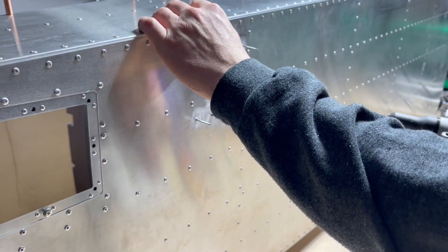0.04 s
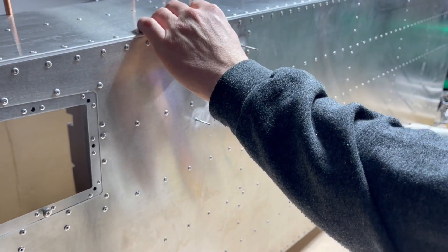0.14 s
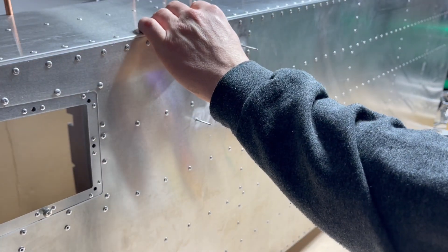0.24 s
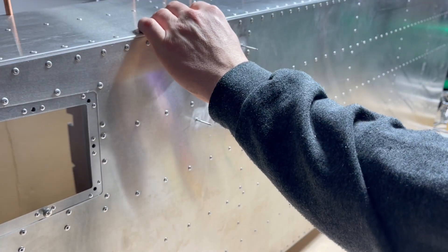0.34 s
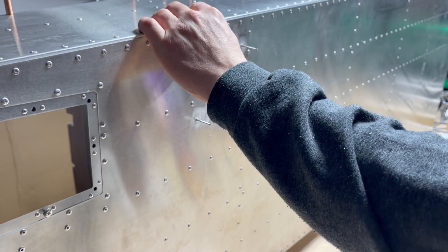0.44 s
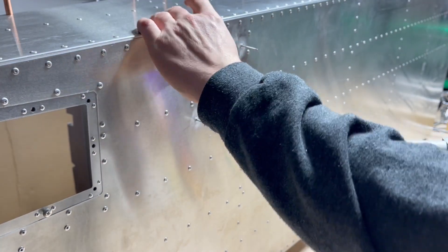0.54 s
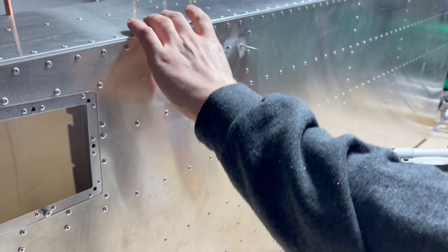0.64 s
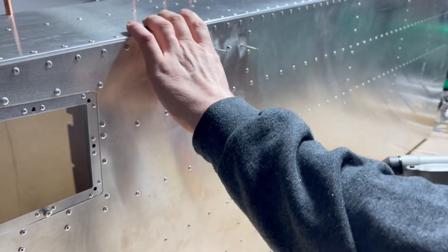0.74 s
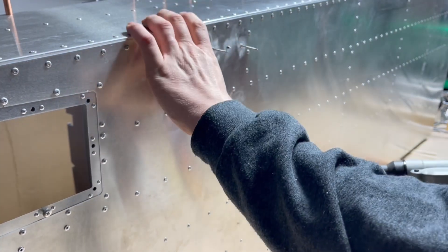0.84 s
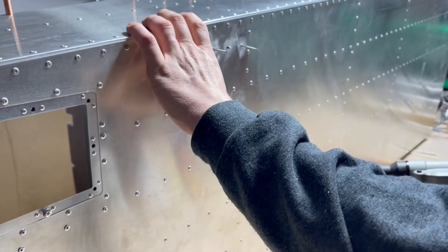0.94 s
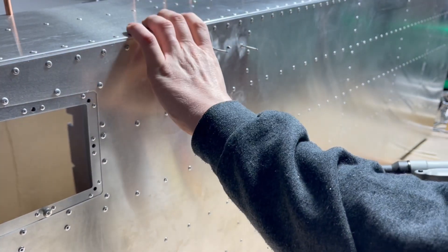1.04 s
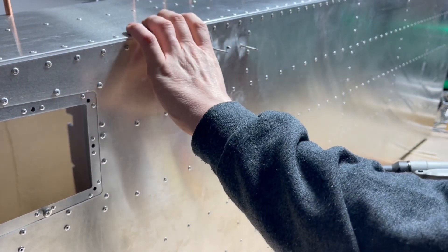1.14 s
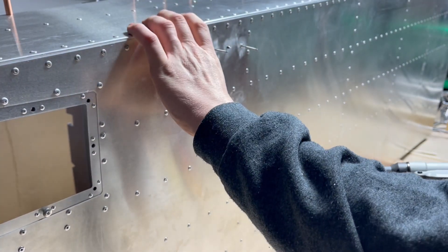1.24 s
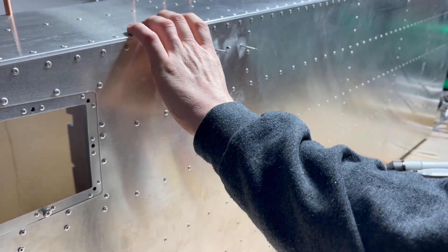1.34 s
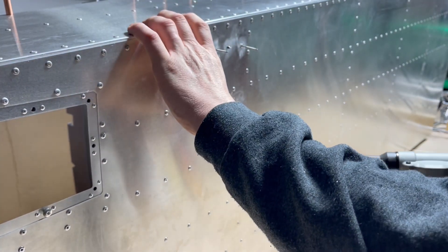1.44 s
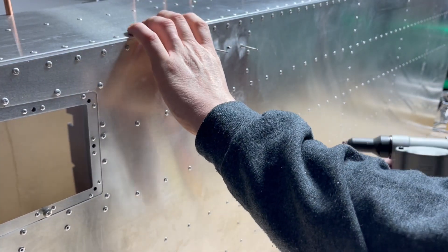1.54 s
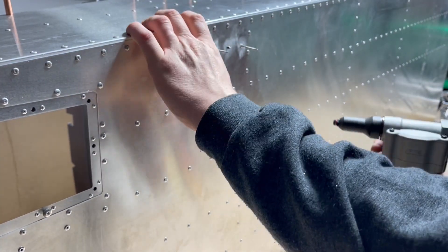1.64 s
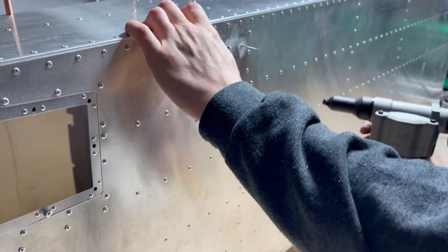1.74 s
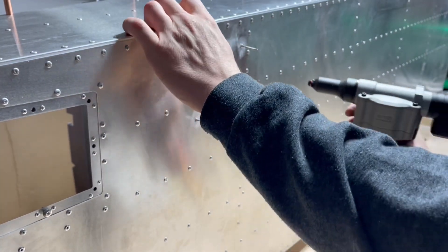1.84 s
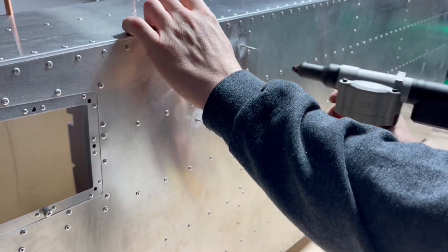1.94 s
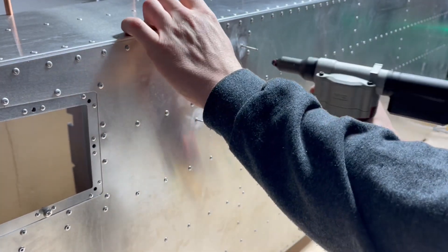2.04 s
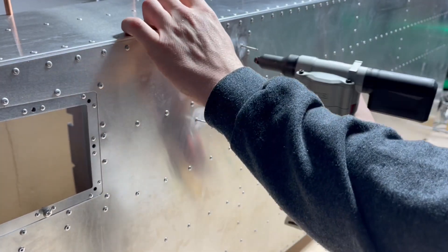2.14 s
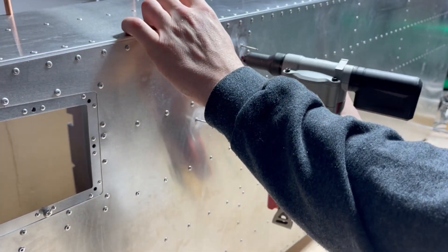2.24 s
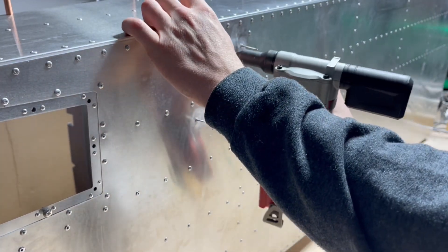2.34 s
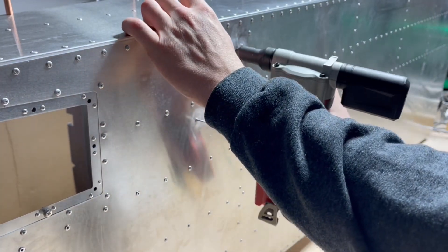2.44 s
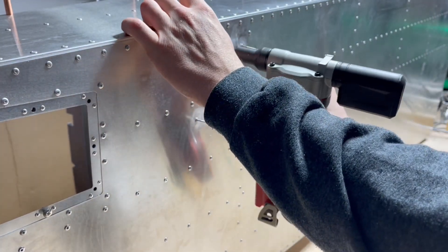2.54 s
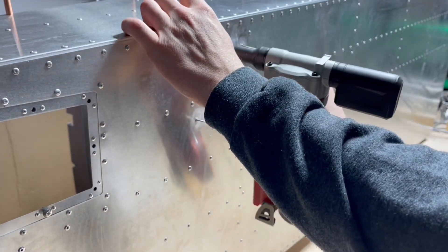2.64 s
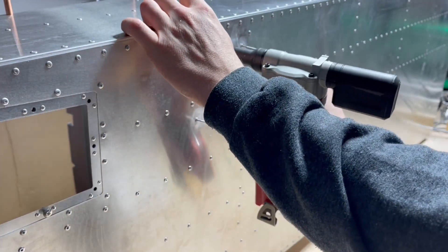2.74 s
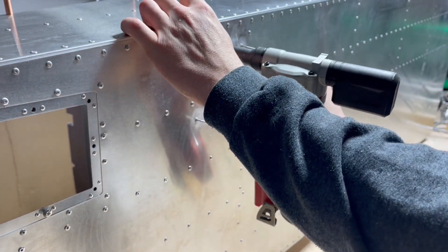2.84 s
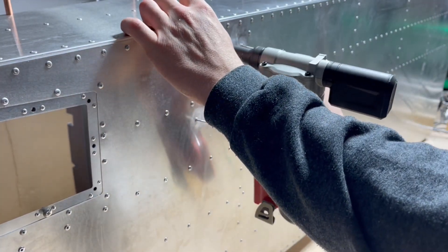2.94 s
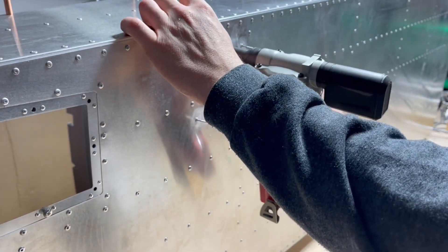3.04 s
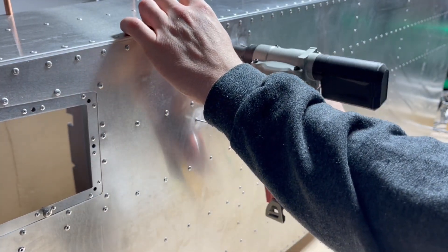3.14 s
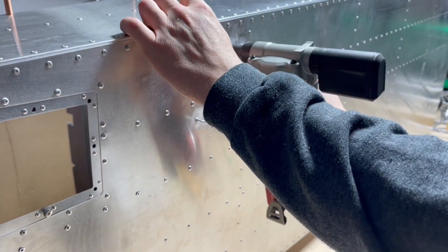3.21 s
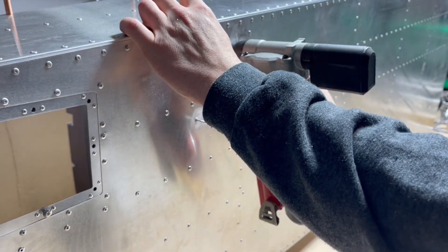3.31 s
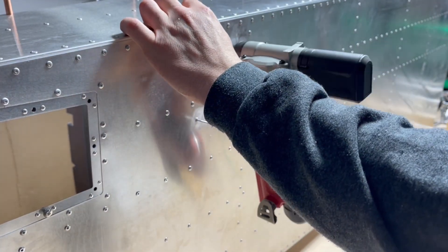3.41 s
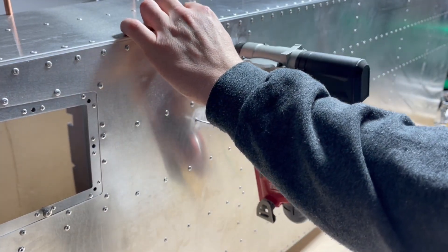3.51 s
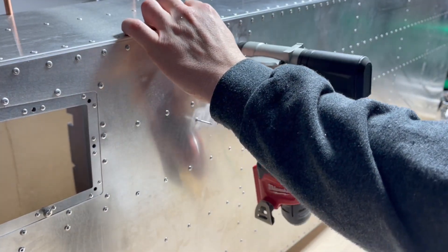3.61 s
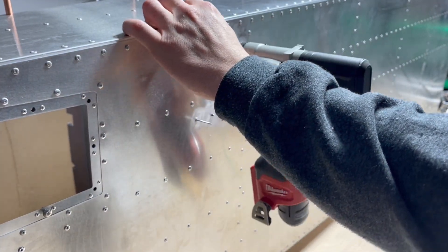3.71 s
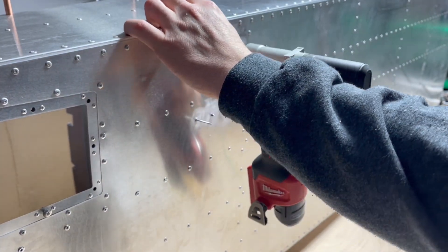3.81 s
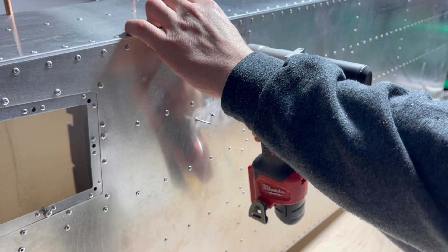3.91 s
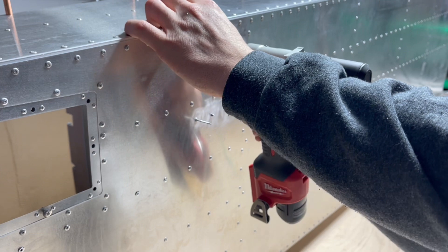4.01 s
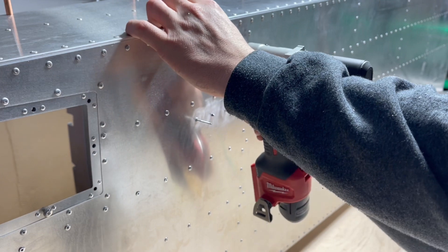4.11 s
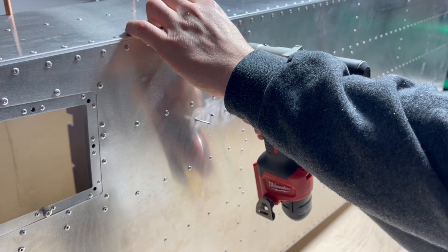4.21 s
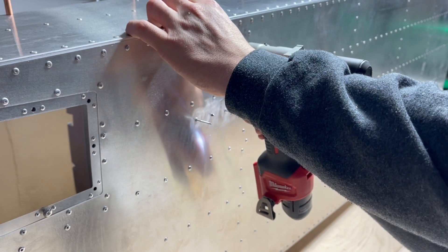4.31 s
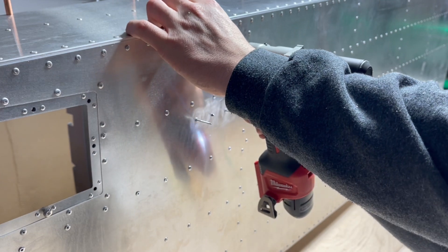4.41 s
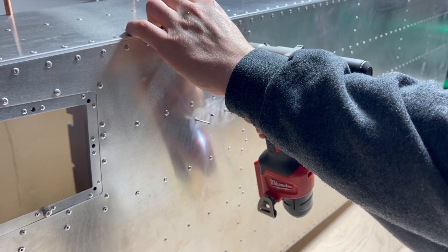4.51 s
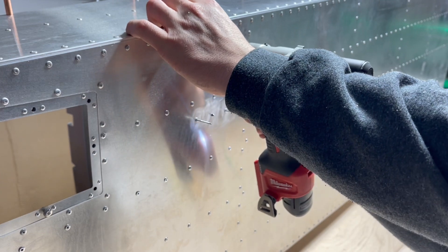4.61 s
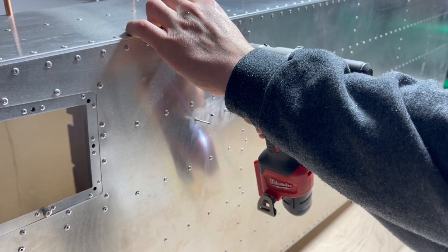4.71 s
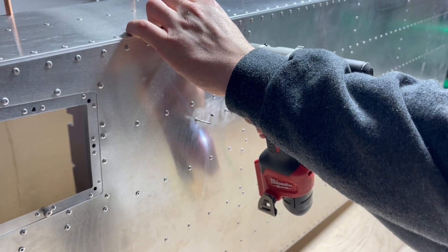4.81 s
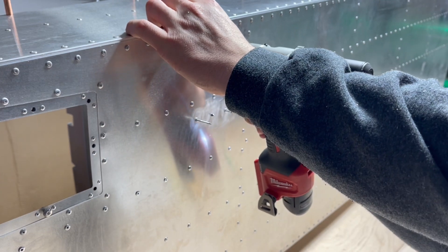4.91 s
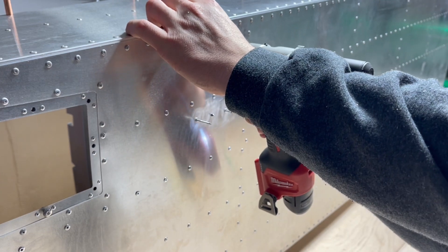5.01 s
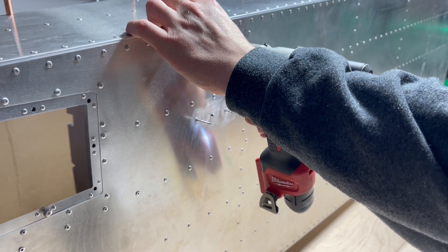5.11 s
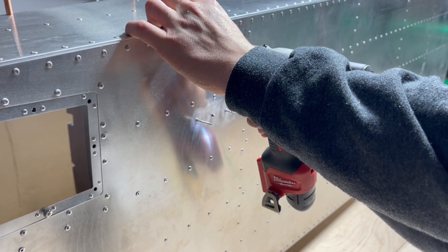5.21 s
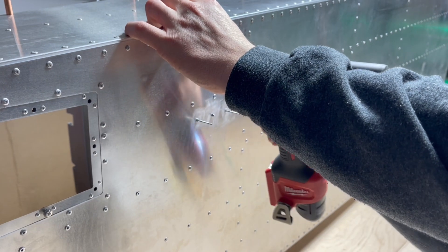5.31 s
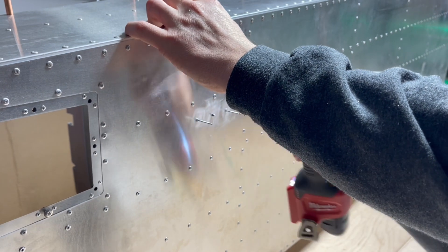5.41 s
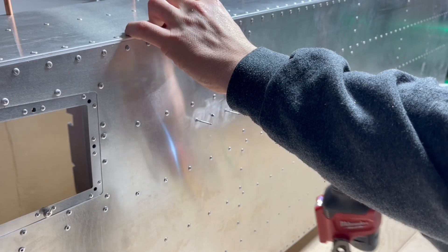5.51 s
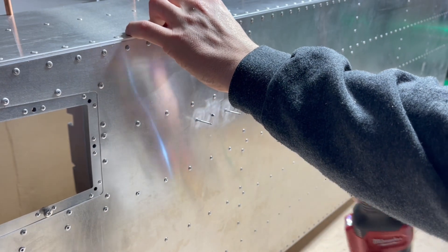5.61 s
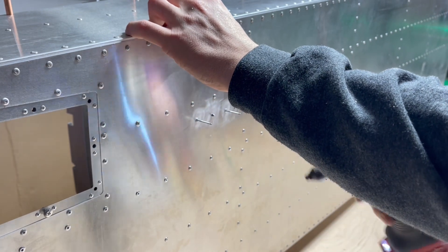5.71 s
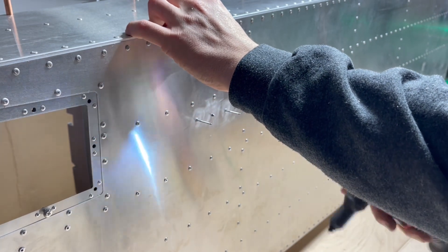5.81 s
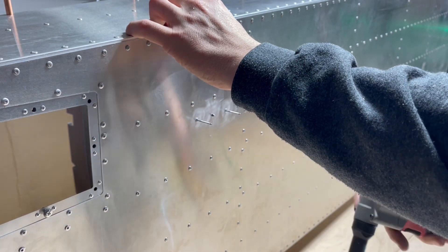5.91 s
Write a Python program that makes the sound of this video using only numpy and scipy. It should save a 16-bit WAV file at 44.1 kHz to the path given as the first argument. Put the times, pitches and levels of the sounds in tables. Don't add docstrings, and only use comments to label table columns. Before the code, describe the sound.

Fingers click and a sleeve rustles, a tool nose knocks and scrapes on sheet metal, then a motor whirs, snaps and runs back.

```python
import sys
import numpy as np
from scipy import signal
from scipy.fft import rfft, irfft, next_fast_len
from scipy.io import wavfile
from scipy.ndimage import uniform_filter1d

SR = 44100
rng = np.random.default_rng(int(sys.argv[2]) if len(sys.argv) > 2 else 0)


def to_wav(sig):
    pcm = np.clip(np.atleast_2d(sig), -1, 1) * 32767
    pcm = np.round(pcm).astype(np.int16)
    wavfile.write(sys.argv[1], SR, pcm.T)


def volts_from_db(level):
    exponent = np.asarray(level, float) / 20
    return 10 ** exponent


N = 262395
T = np.arange(N) / SR
HZ = np.maximum(np.arange(N // 2 + 1) * SR / N, 1)

# switch on in seconds, half speed in seconds,
# spin-up time in seconds, running whine in Hz, creep in Hz per second.
RUNS = [
    (4.42, 4.514, .033, 834.3, 20),
    (5.385, 5.455, .03, 804, 70),
]
# resonance in Hz, width in Hz, level in dB.
GEARS_PULL = [(2020, 130, -0.5), (2244, 100, 2.5), (2500, 93, 1.5), (2694, 87, 5), (2960, 62, 3.5),
              (3150, 75, 3), (3360, 67, 0), (3690, 170, -2.5), (1710, 1300, -9)]
# multiple of the whine, level in dB re gear rattle.
TEETH = [(2.53, -19), (2.77, -23), (3.25, -17), (3.5, -16), (3.8, -16), (4.0, -16)]
# multiple of the whine, level in dB re rattle while speeding up.
MESH = [(4.1, -9), (2.75, -12)]
# frequency in Hz, level in dB per Hz.
BRUSHES = [(2240, -37), (3800, -11.5), (4750, -9.5), (7000, -6.5), (8820, -1.5), (10100, -5), (11600, 1),
           (12700, -1.5), (13300, -36), (15100, -7.5), (16000, -25)]
# multiple of the whine, level in dB re brush hiss.
BARS = [(10.25, -23), (10.8, -26), (14.2, -12)]
# resonance in Hz, width in Hz, level in dB.
LOADED_LOW = [(209, 17, -3), (278, 21, -6), (250, 20, -23), (387, 28, -14)]
# resonance in Hz, width in Hz, level in dB.
LOADED_MID = [(521, 28, -1), (623, 31, -1), (582, 21, -6.5), (679, 31, -2), (782, 47, -5.5),
              (935, 250, -16), (1128, 23, -9), (1252, 35, -10.5), (1480, 68, -11.5)]
# mode in Hz, level in dB re load.
DRIVEN = [(206, -2), (286, -10), (516, -6), (620, -10.5)]
# resonance in Hz, width in Hz, level in dB.
FACING = [(1880, 46, 3), (2026, 110, 2), (790, 51, -9), (2604, 97, -2), (3040, 120, -4), (3300, 350, -6.5)]
# resonance in Hz, width in Hz, level in dB.
SWUNG = [(840, 100, -14.5), (1642, 73, 0), (1780, 100, -8), (2680, 72, -3), (3030, 140, -4),
         (3500, 180, -7.5)]
# time in seconds, lower resonance in Hz,
# its level in dB, upper resonance in Hz, its level in dB.
CASING = [
    (5.39, 1980, -57, 2980, -61),
    (5.452, 1995, -47, 3080, -60),
    (5.548, 1885, -36, 3040, -47),
    (5.58, 1867, -44, 2980, -44),
    (5.606, 1923, -35, 3020, -39),
    (5.704, 1905, -41, 3030, -33),
    (5.794, 1632, -38, 3060, -50),
    (5.928, 1820, -45, 2890, -42),
    (5.95, 1900, -33, 2920, -42),
]
# frequency in Hz, level in dB per Hz.
CRACK = [(530, -30), (900, -3), (1910, -12), (2690, -12.5), (3920, -17.5), (4950, -8), (8660, -8),
         (10100, -2.5), (11900, -4.5), (15700, -46), (16500, -43)]
# time in seconds, peak in dB, hardness as middle modes in dB.
KNOCKS = [(2.611, -22, -12), (2.685, -30, -8.5), (2.734, -37.5, -6), (2.883, -23, -13.5),
          (2.939, -29.5, -13.5), (3.053, -31, -.5), (3.107, -30.5, -2), (3.321, -14.5, -9.5),
          (3.44, -33, -15), (3.55, -32.5, -15), (4.069, -38, -3), (4.99, -16, -7.5), (5.029, -23, -11),
          (5.199, -26.5, -3.5), (5.388, -33, -11.5)]
# mode in Hz, level in dB, t60 in seconds.
SKIN = [(92.3, -2, 0.63), (153.5, -12.5, 0.67), (210.5, -5, 0.86), (288.5, -8, 1.2), (354.7, -12, 0.42),
        (507.3, 2.5, 0.2), (631, -8, 0.35), (810, -2.5, 0.19), (930, -26, 0.53), (1042, -16, 0.81),
        (1110, -32, 0.71), (1281, -36, 0.34), (1295, -27, 0.15), (1459, -49, 0.36),
        (121.4, -7, 0.45), (51.7, -18, 0.66)]
# time in seconds, scrape in dB.
SLIPS = [
    (3.05, -49.5),
    (3.11, -48.5),
    (3.15, -49),
    (3.185, -33.5),
    (3.205, -32.5),
    (3.248, -28.5),
    (3.272, -35),
    (3.292, -36.5),
    (3.31, -36),
]
# resonance in Hz, width in Hz, level in dB.
JAWS = [(1080, 65, -7.5), (1460, 71, 13), (2140, 220, 5), (2710, 84, 5.5), (3130, 22, 6), (3740, 22, -12),
        (5700, 93, -20)]
# time in seconds, peak in dB, ring in Hz,
# bright share in dB, fall in seconds.
CLICKS = [(.0074, -28, 2380, 3, 0.0036), (0.0224, -22, 1490, 3.5, .004), (.035, -38, 2500, 2, .003),
          (.057, -38, 4400, 3, .002), (0.067, -36, 1480, 2, .005), (0.0737, -32, 1500, 2, .004),
          (.083, -38, 2450, -1, .003), (0.096, -35, 1920, -2, .003), (0.2055, -33.5, 1830, 3.5, .003),
          (.229, -42, 4500, 3, .002), (0.2884, -30, 1950, 2, .006), (0.3065, -36, 1260, 0, .002),
          (.3205, -30, 1610, 3, .003), (.33, -38, 1900, 3, .004), (.346, -41, 1900, 0, .002),
          (0.352, -22, 1630, -1, .003), (0.43, -38, 1940, 0.5, 0.0036), (1.0105, -38, 2100, -4, .005),
          (1.044, -54, 2100, 3, .004), (1.5934, -62, 1320, 3, .0044), (4.2974, -48, 1310, 7, 0.0044),
          (4.3515, -35, 1650, 2.5, 0.0036), (5.2667, -31, 1590, 1.5, .0044),
          (5.336, -41.5, 2046, 6.5, 0.0051)]
# time in seconds, peak in dB, ring in Hz, fall in seconds.
TAPS = [(1.093, -52, 1240, .004), (2.457, -44.5, 1510, 0.0018), (2.607, -35, 1460, 0.0096),
        (2.6244, -34, 1340, 0.01), (2.6858, -27.5, 1400, 0.0048), (2.8614, -43, 2430, 0.0064),
        (2.873, -45.5, 2650, 0.02), (2.9206, -52, 2480, .0055), (3.0051, -45, 2530, 0.0083),
        (3.0434, -38, 2650, 0.004), (3.0492, -37.5, 2730, 0.013), (3.108, -43, 2650, 0.0064),
        (3.3084, -20, 1450, 0.004), (3.852, -47.5, 1540, 0.0076), (4.05, -45.5, 1230, .0048)]
# time in seconds, peak in dB, ring in Hz, fall in seconds.
CATCHES = [(3.1679, -38, 1240, .004), (3.1784, -29, 1470, .008), (3.1879, -28.5, 1450, 0.013),
           (3.204, -25, 2730, .006), (3.2125, -27, 1150, .005), (3.233, -26, 2740, .008),
           (3.2448, -22, 1450, 0.008), (3.2525, -26, 3200, .005), (3.262, -24, 2200, 0.0045),
           (3.284, -24, 1500, .006), (3.292, -31, 2300, 0.0044), (3.336, -39, 1550, 0.016)]
# time in seconds, rustle in dB, fall in seconds.
BRUSHINGS = [(.012, -43, 0.023), (0.028, -45, 0.025), (0.072, -36.5, 0.023), (.095, -41, 0.031),
             (0.214, -50, 0.14), (0.294, -48, .03), (.335, -50, 0.034), (.365, -52, .02),
             (.385, -54, 0.025), (.435, -53, 0.013), (.56, -59.5, 0.091), (.6, -59.5, 0.068),
             (.67, -61, 0.059), (.89, -65.5, .03), (1.02, -62, .02), (1.05, -67, 0.017),
             (1.596, -58, 0.022), (1.87, -71.5, .04), (2.62, -63, 0.027), (2.69, -50.5, 0.022),
             (3.04, -63, .02), (3.334, -45, 0.036), (3.48, -65, 0.075), (3.63, -69.5, .06),
             (3.8, -77, 0.14), (4.05, -63, 0.027)]
# frequency in Hz, level in dB per Hz.
CLOTH = [(650, -48), (1100, -13), (1550, 0.5), (1950, -4), (2400, -6.5), (3090, -11), (8950, -6.5),
         (11400, -4), (12700, -14.5), (14000, -60)]
# tone in Hz, level in dB rms.
FAN_TONES = [(86.1, -49), (150.7, -49.5), (166.9, -48), (220.7, -56.5), (242.2, -57), (339.1, -71.5)]
# frequency in Hz, level in dB per Hz.
AIR = [(20, -45), (35, -9.5), (70, 1.5), (120, 0), (190, -6.5), (270, -16), (361, -11), (420, -16.5),
       (950, -20), (1300, -24), (3000, -36), (6580, -53.5), (11400, -53), (13000, -52)]
# frequency in Hz, side minus mid in dB.
SIDE_DB = [(60, -32), (110, -3), (200, 5), (380, -5.5), (700, 1), (1290, -1), (2380, -1), (4400, -1.5),
           (8120, -3), (15000, 1.5)]
# frequency in Hz, radians by which left leads, left over right
# in dB.
LEFT_RIGHT = [(100, 0, -1), (500, .1, 1), (1720, .1, 2), (2400, .6, 2), (3620, .7, 3), (6800, 0, 2),
              (7490, 1, 1), (8700, -.2, 0), (10250, -3.1, 0), (11800, -6.3, 0), (16000, -6.3, 0)]
# centre in Hz, rarity in spreads.
TOP_STRIPS = [(14700, 1.0), (15100, .5), (15400, .1), (15700, .3)]

WHINE_DB, GEAR_DB, HISS_DB = (-41.5, -55), (-38.5, -36), (-38.5, -38)
WHINE_POWER, GEAR_POWER, HISS_POWER = 1.7, 1.22, 1.06
BARS_POWER = 3.5
START_HZ, SWITCH_S = 200.8, 0.016
BRAKE_S, BRAKE_HZ_PER_S, BRAKE_DB_PER_S = 5.235, 2700, 341
WHINE_CUT_DB = -12
MESH_RING_HZ, MESH_RING_WIDTH_HZ, MESH_RING_DB = 2230, 150, 0
GRIP_S, SAG_HZ, SPRING_BACK_S = 4.72, 80.1, 0.033
JAWS_CLOSED_DB = 3
STRAIN_GEAR_DB, STRAIN_HISS_DB, STRAIN_WHINE_DB, STRAIN_SETS_IN_S = 1.6, 9, 6, 0.06
IDLE_LOW_DB, IDLE_MID_DB, SLACK_LOW_DB = -44.5, -48, -39.5
GRIP_LOW_DB, GRIP_RISE_S, STIFFEN_S = -31, 0.02, 0.28
TAUT_MID_DB, TAUT_GROWS_DB = -31.5, 5
RECOIL_LOW_DB, RECOIL_MID_DB, RECOIL_HISS_DB = -28, -19.5, -25.5
RECOIL_LAG_S, RECOIL_LOW_S, RECOIL_MID_S = 0.022, 0.071, 0.024
SWING_OUT_S, SWING_BACK_S, SWING_TAKES_S = 5.7, 5.93, .02
SWUNG_WHINE_DB, SWUNG_GEAR_DB, SWUNG_HISS_DB = -14, -2, -1.5
CASING_WIDTH_HZ, CASING_LOW_DB, CASING_HIGH_DB = 45, -.5, -2.5
SNAP_S, SNAP_DB = 4.989, -15
UPPER_PER_HARD, UPPER_DB, TAUT_UPPER_DB = 1.2, -5.5, 16
SLIP_RISE_S, SLIP_FALL_S = 0.014, 0.022
SEATED_S, SEATED_DB = 3.325, -7
SHAKE_DB, SHAKE_LAG_S = 5.5, 0.016
SQUEAL_HZ, SQUEAL_DB = 577, 6.5
SQUEAL_FROM_S, SQUEAL_RISE_S, SQUEAL_POWER = 3.2, 0.013, 1.2
CLICK_PAN_DB, CLICK_TOP_DB = 4, 1
TAP_BRIGHT_DB, TAP_PAN_DB = -27, 8
CATCH_BRIGHT_DB, CATCH_PAN_DB = -8.5, 11
BRUSH_RISE_S = 0.0068
FAN_WHINE_HZ, FAN_WHINE_WIDTH_HZ, FAN_WHINE_DB = 962, 69, -56.5
AIR_DB = -45.5
SHOP_T60_S, SHOP_DB = 0.57, -7
STEADY_TOP_HZ, OVERTOP_DB = 13500, -1


def motor():
    brushes = coloured(slope(BRUSHES), grit_db=-0.5, side_db=-4.0)
    band = 0.4 / (1 + (1300 / HZ) ** 4 + (HZ / 3800) ** 6)
    return motor_pulls(brushes, band) + motor_runs_back(brushes, band)


def motor_pulls(brushes, band):
    gate, hz, db, gear, rush, low, middle = pulling()
    tone, turn = whine(hz, db)
    throb = 1 + .2 * np.sin(turn / 13) + .12 * np.sin(turn / 6.5)
    rattle = coloured(humps(GEARS_PULL, base=0.8 * band), grit_db=-0.5, side_db=-5)
    gears = swayed(rattle, depth=0.027) + strands(turn, TEETH)
    speeding = np.clip(np.gradient(hz) * SR / 3500, .15, 1) * np.clip(hz / 520, 0, 1)
    for k, mesh_db in MESH:
        mesh = np.sin(k * turn + 0.96 * drift(60))
        gears = gears + speeding * volts_from_db(mesh_db + 3.2 * drift(60)) * mesh
    passing = 1 / (1 + ((MESH[0][0] * hz - MESH_RING_HZ) / 400) ** 4)
    gears = gears + passing * volts_from_db(MESH_RING_DB) * narrow(MESH_RING_HZ, MESH_RING_WIDTH_HZ)
    hiss = brushes + (hz / hz.max()) ** BARS_POWER * strands(turn, BARS)
    loaded = low * coloured(humps(LOADED_LOW), side_db=-16)
    loaded = loaded + middle * coloured(humps(LOADED_MID), side_db=-4.5)
    for mode_hz, mode_db in DRIVEN:
        load = low if mode_hz < 420 else middle
        mode = np.sin(2 * np.pi * mode_hz * T + 1.3 * drift(16))
        loaded = loaded + load * volts_from_db(mode_db + 3.3 * drift(13)) * mode
    return gate * (tone + throb * (gear * gears + rush * hiss) + loaded)


def motor_runs_back(brushes, band):
    gate, hz, db, gear_db, hiss_db, swing = running_back()
    tone, turn = whine(hz, db)
    facing, swung = (coloured(humps(peaks, base=0.73 * band), grit_db=1.5, side_db=-5.5)
                     for peaks in (FACING, SWUNG))
    gears = np.sqrt(1 - swing) * swayed(facing, depth=.021)
    gears = gears + 1.1 * np.sqrt(swing) * swayed(swung, depth=.02)
    hiss = brushes + 0.66 * (hz / hz.max()) ** BARS_POWER * strands(turn, BARS)
    return gate * (tone + casing() + volts_from_db(gear_db) * gears + volts_from_db(hiss_db + drift(63.6)) * hiss)


def pulling():
    before, braked_s = T < SNAP_S, np.maximum(T - BRAKE_S, 0)
    climbing = np.clip((T - GRIP_S) / (SNAP_S - GRIP_S), 0, 1)
    tension = np.where(before, climbing, np.exp(-np.abs(T - SNAP_S) / SPRING_BACK_S))
    strain = step(GRIP_S, STRAIN_SETS_IN_S) * np.where(before, 1, tension)
    gate, hz, speed_db = spin(RUNS[0], SAG_HZ * tension + BRAKE_HZ_PER_S * braked_s)
    gate = gate * volts_from_db(-BRAKE_DB_PER_S * braked_s)
    cut_db = WHINE_CUT_DB * step(BRAKE_S - .035, 0.0088)
    recoil_s = SNAP_S + RECOIL_LAG_S
    db = WHINE_DB[0] + WHINE_POWER * speed_db + STRAIN_WHINE_DB * tension + cut_db
    gear = volts_from_db(GEAR_DB[0] + GEAR_POWER * speed_db + JAWS_CLOSED_DB * before + STRAIN_GEAR_DB * strain)
    hiss = blend([volts_from_db(HISS_DB[0] + HISS_POWER * speed_db + STRAIN_HISS_DB * strain),
                  swell(recoil_s, RECOIL_HISS_DB, 0.0092, RECOIL_MID_S)])
    low = blend([volts_from_db(np.where(before, IDLE_LOW_DB, SLACK_LOW_DB) + 2.4 * speed_db),
                 swell(GRIP_S, GRIP_LOW_DB, GRIP_RISE_S, STIFFEN_S) * before,
                 swell(recoil_s, RECOIL_LOW_DB, 0.0097, RECOIL_LOW_S)])
    taut = step(GRIP_S + 0.012, GRIP_RISE_S) * before * volts_from_db(TAUT_MID_DB + TAUT_GROWS_DB * tension)
    recoil = swell(SNAP_S + 0.0048, RECOIL_MID_DB, 0.0036, RECOIL_MID_S)
    middle = blend([volts_from_db(IDLE_MID_DB), taut, recoil])
    return gate, hz, db, gear, hiss, low, middle


def running_back():
    gate, hz, speed_db = spin(RUNS[1])
    swing = step(SWING_OUT_S, SWING_TAKES_S) - step(SWING_BACK_S, SWING_TAKES_S)
    swing = np.clip(swing, 0, 1)
    away = step(SWING_OUT_S - .07, SWING_TAKES_S)
    db = WHINE_DB[1] + WHINE_POWER * speed_db + SWUNG_WHINE_DB * away
    gear_db = GEAR_DB[1] + GEAR_POWER * speed_db + SWUNG_GEAR_DB * swing
    hiss_db = HISS_DB[1] + HISS_POWER * speed_db + SWUNG_HISS_DB * swing
    return gate, hz, db, gear_db, hiss_db, swing


def spin(run, sag_hz=0):
    on_s, half_s, spin_s, top_hz, creep = run
    gain_hz = top_hz - START_HZ + creep * np.maximum(T - half_s, 0)
    hz = START_HZ + gain_hz * step(half_s, spin_s) - sag_hz
    hz = np.maximum(hz, 50)
    return step(on_s, SWITCH_S), hz, 20 * np.log10(hz / top_hz)


def whine(hz, db):
    turn = 2 * np.pi * np.cumsum(hz) / SR + 0.49 * drift(27.8)
    return volts_from_db(db + 3.5 + 1.6 * drift(17)) * np.sin(turn), turn


def strands(turn, orders):
    return sum(volts_from_db(db + 6.1 * drift(6)) * np.sin(k * turn + 1.9 * drift(14)) for k, db in orders)


def casing():
    s, *columns = np.transpose(CASING)
    low_hz, low_db, high_hz, high_db = (np.interp(T, s, c) for c in columns)
    low = volts_from_db(low_db + CASING_LOW_DB) * narrow(low_hz, CASING_WIDTH_HZ)
    high = volts_from_db(high_db + CASING_HIGH_DB) * narrow(high_hz, 1.5 * CASING_WIDTH_HZ)
    return (low + high) / np.sqrt(2)


def swayed(x, depth):
    at = np.arange(N) + np.cumsum(depth * drift(4))
    return np.array([np.interp(at, np.arange(N), side) for side in x])


def snap():
    t = np.maximum(T - SNAP_S, 0)
    fall = (T >= SNAP_S) * (np.exp(-t / 0.003) + volts_from_db(-6.0) * np.exp(-t / 0.031))
    return volts_from_db(SNAP_DB + 4.0) * fall * volts_from_db(2 * drift(496)) * coloured(slope(CRACK), side_db=-4.0)


def skin():
    out, modes = np.zeros((2, N)), SKIN
    s, db, middle_db = np.transpose(KNOCKS)
    upper_db = UPPER_PER_HARD * middle_db + UPPER_DB + TAUT_UPPER_DB * (np.abs(s - SNAP_S) < .1)
    quiet = int(s.min() * SR)
    luck = rng.standard_normal((len(KNOCKS), len(modes), 3))
    for k, (hz, mode_db, t60) in enumerate(modes):
        hardness_db = 0 if hz < 190 else middle_db + 4 if hz < 420 else upper_db - 2
        blow_db = db + hardness_db + mode_db - 2.5
        rolling_s = 0.0094 * np.abs(luck[:, k, 2]) * (np.abs(s - SNAP_S) > .01)
        struck = ((s + rolling_s) * SR).astype(int) - quiet
        for twin, detune in enumerate((.94, 1.03)):
            force = np.zeros(N - quiet)
            force[struck] = volts_from_db(blow_db + 2.0 * luck[:, k, twin]) * (-1) ** k
            boom = ring(force, hz * detune, min(t60, .5) * 0.63) - ring(force, hz * detune, 6.6 / hz)
            out[:, quiet:] += boom * volts_from_db(np.array([[1], [-1]]) * (twin - .5) * hz / 200)
    return out


def scrape():
    level, shaken, locked = slipping()
    wide = [(hz, 1.8 * width, peak_db + 2) for hz, width, peak_db in JAWS]
    base = 1.1 * (HZ > 900) / (1 + (HZ / 4000) ** 2 + (HZ / 10500) ** 16)
    jaws = coloured(humps(wide, base=base), grit_db=0.5, side_db=-5.0)
    sheet = coloured(humps([(650, 35, 2.0), (476, 110, -1.5), (282, 63, 0.5), (855, 260, -5.5),
                            (1093, 61, -3.5)]))
    tone = np.sin(2 * np.pi * SQUEAL_HZ * T + drift(25))
    squeal = locked * volts_from_db(2.5 + 2.0 * drift(40)) * tone
    return level * volts_from_db(2.16 * drift(90)) * jaws + shaken * sheet + squeal


def slipping():
    level = blend(swell(s, db, SLIP_RISE_S, SLIP_FALL_S) for s, db in SLIPS)
    level = level * volts_from_db(SEATED_DB * step(SEATED_S, 0.0056))
    keep = np.exp(-1 / (SHAKE_LAG_S * SR))
    late = signal.lfilter([1 - keep], [1, -keep], level)
    locking = step(SQUEAL_FROM_S, SQUEAL_RISE_S) * (late / late.max()) ** SQUEAL_POWER
    return level, volts_from_db(SHAKE_DB) * late, volts_from_db(SQUEAL_DB) * locking * late


def ticks():
    out, t, rows = np.zeros((2, N)), T[:2500], contacts()
    bright = signal.butter(2, [4000, 9700], "band", fs=SR, output="sos")
    top = signal.butter(2, [10600, 11100], "band", fs=SR, output="sos")
    whites = rng.standard_normal((len(rows), 2500))
    for (s, db, hz, bright_db, pan_db, fall_s), white in zip(rows, whites):
        dull = signal.butter(2, [0.67 * hz, max(3500, 1.16 * hz)], "band", fs=SR, output="sos")
        body = 0.39 * np.sin(2 * np.pi * hz * t) + 1.09 * signal.sosfilt(dull, white)
        edge = volts_from_db(CLICK_TOP_DB + 3.5) * signal.sosfilt(top, white)
        burst = volts_from_db(bright_db - 4.0) * (signal.sosfilt(bright, white) + edge)
        share = np.sqrt(max(1 - volts_from_db(bright_db) ** 2, .02))
        fall = 0.7 * np.exp(-t / fall_s) + 0.23 * np.exp(-t / 0.0004)
        sound = fall * (share * body + burst)
        sound = volts_from_db(db - 1.0) * sound / np.abs(sound).max()
        add(out, s, sound * volts_from_db([[pan_db / 4], [-pan_db / 4]]))
    return out


def contacts():
    clicks = [(*row, CLICK_PAN_DB, fall_s) for *row, fall_s in CLICKS]
    taps = [(*row, TAP_BRIGHT_DB, TAP_PAN_DB, fall_s) for *row, fall_s in TAPS]
    catches = [(*row, CATCH_BRIGHT_DB, CATCH_PAN_DB, fall_s) for *row, fall_s in CATCHES]
    return clicks + taps + catches


def sleeve():
    level = blend(swell(s, db, BRUSH_RISE_S, fall_s) for s, db, fall_s in BRUSHINGS)
    return level * volts_from_db(1.5 + 2.0 * drift(70)) * coloured(slope(CLOTH), grit_db=2.5, side_db=-2.5)


def workshop():
    tones = sum(volts_from_db(db + 2.5 + drift(7.3)) * np.sin(2 * np.pi * hz * T + 1.14 * drift(1.4))
                for hz, db in FAN_TONES)
    far_whine = np.array([narrow(FAN_WHINE_HZ, FAN_WHINE_WIDTH_HZ / 2) for side in "LR"])
    return tones + volts_from_db(FAN_WHINE_DB) * far_whine + volts_from_db(AIR_DB) * coloured(slope(AIR))


def shop(x):
    size = next_fast_len(N + SR)
    w = 2 * np.pi * np.arange(size // 2 + 1) / size
    t60 = SHOP_T60_S / (1 + w * SR / (2 * np.pi * 6000))
    lap = np.log(1000) / SR / t60 + 1j * w
    lags = rng.integers(1100, 2600, (2, 8))
    left, right = [sum(1 / (1 - np.exp(-d * lap)) - 1 for d in side) for side in lags]
    echo = np.array([left + 0.38 * right, right + 0.18 * left])
    return irfft(rfft(x.mean(0), size) * echo, size)[:, :N] / 2.35


def left_right(x):
    hz, lead, pan_db = np.transpose(LEFT_RIGHT)
    half = volts_from_db(np.interp(HZ, hz, pan_db) / 2) * np.exp(.5j * np.interp(HZ, hz, lead))
    return irfft(rfft(x) * [half, 1 / half], N)


def overtop(heard):
    high_pass = signal.butter(6, STEADY_TOP_HZ, "high", fs=SR, output="sos")
    high = signal.sosfilt(high_pass, heard.mean(0))
    quick, slow = (uniform_filter1d(np.abs(high), size=size) for size in (150, 3000))
    out = uniform_filter1d(1. * (quick > 3 * slow), size=100) * high
    for hz, rarity in TOP_STRIPS:
        band = signal.butter(3, [hz - 150, hz + 150], "band", fs=SR, output="sos")
        strip = signal.sosfilt(band, high)
        is_open = (drift(9) > rarity) * (slow > volts_from_db(-67)) * (T > RUNS[0][0])
        out = out + volts_from_db(OVERTOP_DB) * uniform_filter1d(1. * is_open, size=300) * strip
    return out


def rms_one(x):
    return x / np.sqrt(np.mean(x ** 2) + 1e-20)


def slope(points):
    hz, db = np.transpose(points)
    return volts_from_db(np.interp(np.log(HZ), np.log(hz), db, left=-99, right=-99))


def humps(peaks, base=0):
    power = sum(volts_from_db(db) ** 2 / (1 + (1.36 * (HZ - hz) / width) ** 2) ** 2 for hz, width, db in peaks)
    return np.sqrt(base ** 2 + power)


def coloured(gain, grit_db=0., side_db=0.):
    white = rng.standard_normal((2, N))
    if grit_db:
        white = white * volts_from_db(grit_db * drift(600))
    mid, side = irfft(rfft(white) * [gain, gain * slope(SIDE_DB) * volts_from_db(side_db)], N)
    return rms_one(np.array([mid + side, mid - side]))


def drift(rate):
    knots = np.convolve(rng.standard_normal(int(4 * rate * N / SR) + 4), [1, 2, 1], "same")
    return rms_one(np.interp(T * 4 * rate, np.arange(len(knots)), knots))


def ring(force, hz, t60):
    r, w = volts_from_db(-60 / (t60 * SR)), 2 * np.pi * hz / SR
    return signal.lfilter([0, np.sin(w)], [1, -2 * r * np.cos(w), r * r], force + 1e-18)


def narrow(hz, width_hz):
    turn = 2 * np.pi * np.cumsum(hz * np.ones(N)) / SR
    return drift(width_hz) * np.cos(turn) + drift(width_hz) * np.sin(turn)


def add(out, s, sound):
    i = round(s * SR)
    out[..., i:i + sound.shape[-1]] += sound[..., :N - i]


def step(s, takes_s):
    return .5 + .5 * np.tanh((T - s) / (2 * takes_s))


def swell(s, db, rise_s, fall_s):
    out = np.zeros(N)
    near = slice(max(int((s - 9 * rise_s) * SR), 0), int((s + 9 * fall_s) * SR))
    out[near] = volts_from_db(db) * np.exp(np.minimum((T[near] - s) / rise_s, (s - T[near]) / fall_s))
    return out


def blend(levels):
    return np.sqrt(sum(level ** 2 for level in levels))


def scene():
    near = motor() + snap() + skin() + scrape() + ticks() + sleeve()
    return left_right(near + volts_from_db(SHOP_DB) * shop(near)) + workshop()


def low_pass(x):
    return signal.sosfilt(signal.butter(12, 16990, fs=SR, output="sos"), x)


def record(dry):
    mid = dry.mean(0)
    side = signal.lfilter(*signal.butter(1, 120, "high", fs=SR), (dry[0] - dry[1]) / 2)
    notch = signal.butter(2, [9850, 10550], "stop", fs=SR, output="sos")
    mid = signal.sosfilt(notch, mid)
    rumble_cut = signal.butter(1, 30, "high", fs=SR, output="sos")
    heard = signal.sosfilt(rumble_cut, [mid + side, mid - side])
    roll_off = signal.cheby2(10, 60, STEADY_TOP_HZ + 300, fs=SR, output="sos")
    below = signal.sosfilt(roll_off, heard)
    mix = 1.184 * np.tanh((below + overtop(heard)) / 1.211)
    return low_pass(mix)


dry = scene()
out = record(dry)
to_wav(out)
```